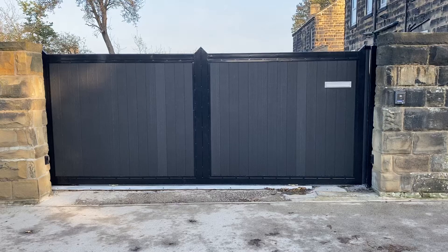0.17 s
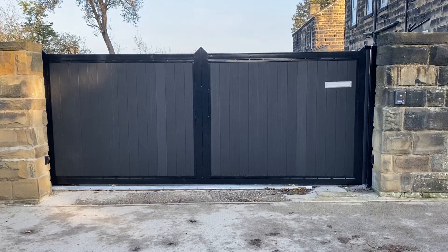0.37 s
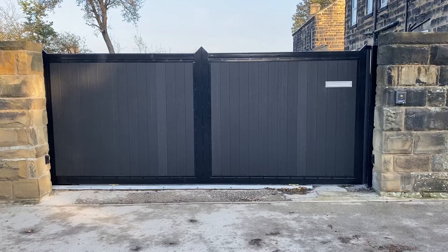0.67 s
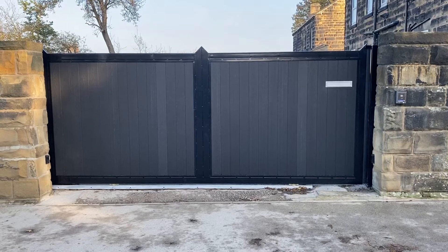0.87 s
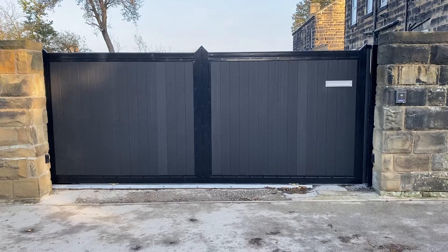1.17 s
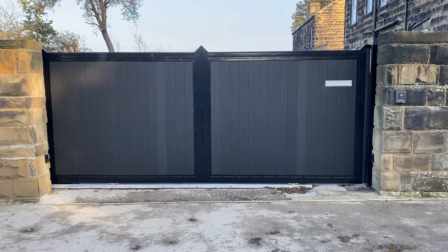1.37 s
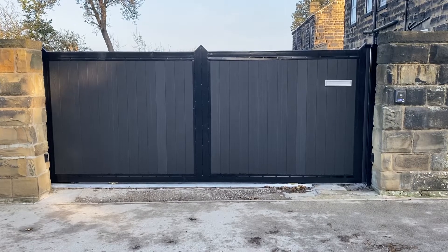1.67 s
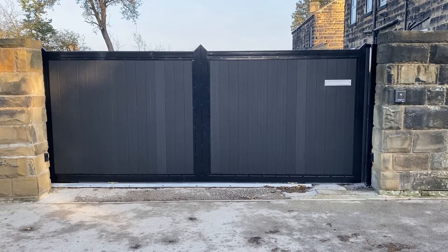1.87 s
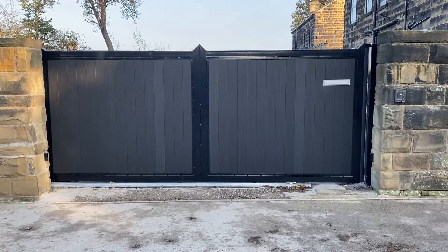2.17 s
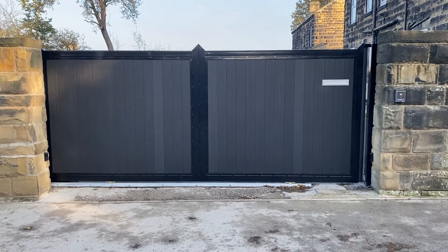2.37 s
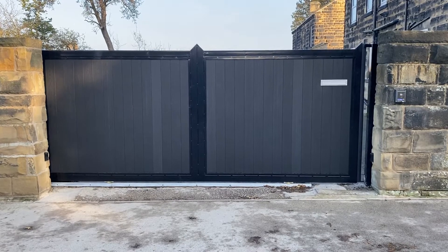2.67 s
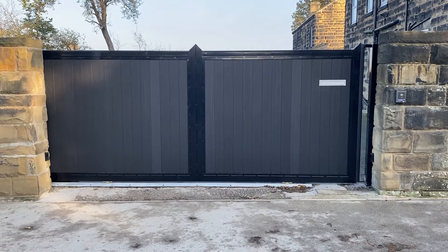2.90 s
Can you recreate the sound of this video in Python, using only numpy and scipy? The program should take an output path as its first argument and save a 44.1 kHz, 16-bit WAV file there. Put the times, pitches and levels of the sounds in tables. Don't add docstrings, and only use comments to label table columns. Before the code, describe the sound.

Distant traffic rumble and hiss outdoors, with a driveway gate motor humming and rolling late

```python
import sys
import numpy as np
from scipy import signal
from scipy.fft import rfft, irfft, next_fast_len
from scipy.io import wavfile
from scipy.ndimage import uniform_filter1d

SR = 44100
rng = np.random.default_rng(int(sys.argv[2]) if len(sys.argv) > 2 else 0)


def unload_wav(signal):
    wavfile.write(
        sys.argv[1],
        SR,
        np.round(np.clip(np.atleast_2d(signal).T, -1, 1) * 32767).astype(np.int16),
    )


def boost(x):
    u = np.asarray(x, float) / 20
    return 10 ** u


N = 134064

# pitch_hz, density_db (per Hz)
TRAFFIC_COLOUR = [(18, -42.5), (30, -12.5), (44, -6.5), (64, -4.5), (85, -9), (107, -8), (204, -9.5),
                  (396, -21), (800, -30.5)]
# pitch_hz, density_db (per Hz)
TYRE_COLOUR = [(450, -4), (950, 1.68), (1950, -7), (2450, -14), (3400, -19), (5200, -34.5), (8500, -48),
               (10300, -49), (12400, -56.5)]
# time_s, level_db
TRAFFIC_FLOW = [(0, 1.5), (.3, 0.9), (.7, 1.1), (1.1, 0.14), (1.5, -0.05), (1.9, 0.47), (2.4, 1.1),
                (3.04, 2.5)]
# time_s, level_db
PASSING_BOOM = [
    (0, -34),
    (.2, -51),
    (.5, -70),
    (1.4, -65.5),
    (1.55, -59),
    (1.8, -69.5),
    (2.5, -46),
    (2.9, -55.5),
    (3.04, -48),
]
# middle_s, length_s, pitch_hz, level_db
LORRY_SURGES = [(.13, .1, 78, -43), (.18, .1, 52, -45), (.235, .1, 77, -45), (.31, .1, 52, -46),
                (.47, .1, 58, -46), (.635, .1, 51, -45), (.85, .13, 51, -42), (.96, .08, 58, -48),
                (1.03, .07, 56, -48), (1.1, .13, 50, -43), (1.25, .12, 51, -43), (1.32, .07, 55, -48),
                (1.405, .12, 46, -43), (1.57, .11, 58, -42)]
# time_s, firing_hz, level_db
FAR_ENGINE = [(.1, 51.95, -55), (.5, 53.7, -63), (.9, 54.49, -54), (1.3, 58.94, -54), (1.7, 61.38, -62.5),
              (2.1, 62.37, -64.5)]
# multiple, level_db
ENGINE_ORDERS = [(1, 6.5), (2, -9), (3, -5.5), (4, -2), (5, -14)]
# time_s, pitch_hz, level_db
RIGHT_BIRD = [(.349, 5500, -92), (.358, 5430, -79.5), (.371, 5230, -84), (.388, 5180, -77),
              (.412, 5090, -76), (.43, 5030, -81), (.446, 4960, -73.5), (.459, 4860, -78),
              (.472, 4730, -92)]
# middle_s, length_s, pitch_hz, level_db
FAR_BIRD = [
    (.367, .014, 5850, -84),
    (.411, .022, 5700, -81),
    (.434, .03, 5640, -88),
    (.462, .012, 5580, -87),
    (.845, .01, 5480, -77.5),
    (.851, .01, 5520, -79),
]
# middle_s, length_s, pitch_hz, level_db
LEFT_BIRD = [
    (1.523, .026, 5520, -82.5),
    (1.539, .022, 5470, -82.5),
    (1.555, .022, 5410, -83),
    (1.572, .028, 5320, -80),
    (1.592, .022, 5270, -83),
    (1.61, .022, 5310, -77.5),
    (1.621, .016, 5100, -83),
    (1.629, .018, 5320, -85),
    (1.64, .02, 5060, -86),
    (1.648, .014, 5250, -84),
]
# time_s, level_db
MOTOR_EFFORT = [
    (1.0, -68.5),
    (1.5, -56),
    (1.62, -52),
    (1.7, -45),
    (1.8, -43.5),
    (2.1, -45),
    (2.45, -41.5),
    (2.7, -44.5),
    (3.04, -45),
]
# multiple, level_db
HUM_ORDERS = [(1, 3.6), (3, -12), (5, -27.5)]
# offset_hz, level_db
DRIVE_SIDEBANDS = [(-255, -5), (-54, -2), (0, -2), (54, 0), (170, -4), (250, -2)]
# time_s, share_of_full_speed
GATE_SPEED = [(1.6, .02), (2.0, .3), (2.5, .45), (2.75, .62), (2.9, .9), (3.04, 1)]
# pitch_hz, width_hz, level_db
PANEL_MODES = [(92, 14, -55), (140, 18, -54), (158, 12, -55), (910, 200, -68), (1850, 800, -68),
               (3300, 2500, -78), (5400, 2400, -84), (10080, 260, -100)]
# pitch_hz, likeness (0-1)
PORT_LIKENESS = [(60, .97), (400, .72), (1600, .6), (2230, .06), (3000, .58), (6900, .22), (8400, .7),
                 (10700, .92)]
# pitch_hz, lead_rad
PORT_LEAD = [(30, -.1), (344, -.6), (750, -2.7), (1900, -2.2), (2500, -4.6), (6400, -6.3), (8400, -9.6),
             (10700, -12.57)]
# pitch_hz, level_db
PORT_TILT = [(60, 0), (250, -1.1), (520, -.4), (900, -3.7), (1600, -1.1), (2900, -.3), (5000, 2.3),
             (7300, 0)]

TRAFFIC_DB, TYRES_DB = -44.5, -53
SWELL_DB, FLICKER_DB = 0.3, 1.2
PASSING_HZ, PASSING_WIDTH_HZ = 74.4, 36
NOTE_SAG_HZ_PER_S, SURGE_SAG_HZ_PER_S = 4500, 40
HUM_HZ, HUM_WOBBLE_DB = 46.5, 1.0
THROB_HZ, THROB_DB, THROB_PEAK_S, THROB_FADES_S = 7.1, 2.2, 1.97, 2.5
DRIVE_HZ, DRIVE_DB = 9997, -105
FAN_HZ, FAN_WIDTH_HZ, FAN_DB = 10280, 110, -107
ROLL_HITS_PER_S, ROLL_SCATTER_DB, BRIGHT_FROM_HZ = 2500, 1.5, 3000
RUMBLE_CUT_HZ, MIC_TOP_HZ = 33, 12200
START_S, SWITCH_STEP, SWITCH_SETTLE_S = 3200 / 44100, -.0095, .001


def curve(table, col=1):
    table = np.array(table, float)
    return np.interp(np.arange(N) / SR, table[:, 0], table[:, col])


def along(table, hz):
    table = np.array(table, float)
    return np.interp(np.log(hz + 1), np.log(table[:, 0] + 1), table[:, 1])


def unit(x):
    return x / np.sqrt(np.mean(x ** 2))


def walk(rate):
    k = int(SR / rate)
    held = np.repeat(rng.standard_normal(N // 400), k)[:N + k]
    slewed = uniform_filter1d(uniform_filter1d(held, k), k)
    return 1.317 * slewed[:N]


def ring(x, hz, width_hz):
    offset = (np.fft.rfftfreq(N, 1 / SR) - hz) / (width_hz / 2)
    return irfft(rfft(x) / (1 + offset ** 2), N)


def stack(hz, orders, wobble_db):
    phase = 2 * np.pi * np.cumsum(hz) / SR
    out = 0
    for multiple, db in orders:
        level = np.sqrt(2) * boost(db + wobble_db * walk(9.29))
        out = out + level * np.sin(multiple * phase + 2 * np.pi * rng.random())
    return out


def swells(rows, sag, lead=0):
    out = 0
    for middle, length, hz, db in rows:
        t = np.arange(N) / SR - middle
        shape = np.cos(np.pi * np.clip(t / length, -.5, .5)) ** 2
        phase = 2 * np.pi * (hz - sag * t / 2) * t + 2 * np.pi * rng.random()
        out = out + np.sqrt(2) * boost(db) * shape * np.sin(phase + lead)
    return out


def road(colour_table, level_db, swell):
    hz = np.fft.rfftfreq(N, 1 / SR)
    colour = boost(along(colour_table, hz)) * (hz >= colour_table[0][0]) * (hz < colour_table[-1][0])
    noise = rfft(rng.standard_normal((2, N))) * colour
    half_octave = 2 * np.log2(hz + 1)
    out = 0
    for k in range(9, 29):
        band = np.clip(1 - np.abs(half_octave - k), 0, 1)
        out = out + irfft(noise * band, N) * boost(swell + FLICKER_DB * walk(5.94))
    return unit(out) * boost(level_db)


def vehicles():
    firing_hz = curve(FAR_ENGINE) * (1 + 0.0197 * walk(6.2))
    engine = stack(firing_hz, ENGINE_ORDERS, 3.04) * boost(curve(FAR_ENGINE, col=2))
    boom = unit(ring(rng.standard_normal(N), PASSING_HZ, PASSING_WIDTH_HZ)) * boost(curve(PASSING_BOOM))
    return engine + boom + swells(LORRY_SURGES, SURGE_SAG_HZ_PER_S)


def birds():
    t = np.arange(N) / SR
    side = np.array([[.5], [-.5]])
    lead = 1.6 * side
    phase = 2 * np.pi * np.cumsum(curve(RIGHT_BIRD) + 14 * walk(87)) / SR
    sings = (t > RIGHT_BIRD[0][0]) * (t < RIGHT_BIRD[-1][0])
    level = boost(curve(RIGHT_BIRD, col=2) + .4 + 1.2 * walk(90) - 3 * side)
    whistle = np.sqrt(2) * sings * level * np.sin(phase + lead)
    chips = swells(FAR_BIRD, NOTE_SAG_HZ_PER_S, lead) * boost(-3 * side)
    left = swells(LEFT_BIRD, NOTE_SAG_HZ_PER_S, lead) * boost(1.3 + 7.5 * side)
    return whistle + chips + left


def motor():
    t = np.arange(N) / SR
    hum = stack(HUM_HZ * (1 + 0.01211 * walk(4.973)), HUM_ORDERS, HUM_WOBBLE_DB) * boost(curve(MOTOR_EFFORT))
    throb = THROB_DB * np.cos(2 * np.pi * THROB_HZ * (t - THROB_PEAK_S))
    hum = hum * boost(throb / (1 + np.exp((t - THROB_FADES_S) / .08)))
    drive_orders = [(DRIVE_HZ + offset, db) for offset, db in DRIVE_SIDEBANDS]
    whine = stack(np.ones(N), drive_orders, 3.0) * boost(DRIVE_DB) * curve(GATE_SPEED) ** 2
    fan = unit(ring(rng.standard_normal(N), FAN_HZ, FAN_WIDTH_HZ)) * boost(FAN_DB)
    return hum + whine + fan


def wheels():
    hits = (rng.random((2, N)) < ROLL_HITS_PER_S / SR) * rng.standard_normal((2, N))
    hits = hits * boost(ROLL_SCATTER_DB * walk(14)) + 0.055 * rng.standard_normal((2, N))
    speed = np.clip(curve(GATE_SPEED), 0, 1)
    out = 0
    for hz, width_hz, db in PANEL_MODES:
        steepness = 2 if hz > BRIGHT_FROM_HZ else 1
        out = out + unit(ring(hits, hz, width_hz)) * boost(db) * speed ** steepness
    return out


def ports(first, second):
    size = next_fast_len(N + 4096)
    hz = np.fft.rfftfreq(size, 1 / SR)
    like = np.clip(along(PORT_LIKENESS, hz), 0, 1)
    tilt = boost(along(PORT_TILT, hz) / 2)
    turn = np.exp(.5j * along(PORT_LEAD, hz))
    first, second = (rfft(np.pad(x, (0, size - N), "reflect")) for x in (first, second))
    shared = np.sqrt((1 + like) / 2) * first
    own = np.sqrt((1 - like) / 2) * second
    left = (shared + own) * turn * tilt
    right = (shared - own) / turn / tilt
    return irfft(np.array([left, right]), size)[:, :N]


def scene():
    swell = SWELL_DB * walk(1.24) + curve(TRAFFIC_FLOW)
    field = road(TRAFFIC_COLOUR, TRAFFIC_DB, swell) + road(TYRE_COLOUR, TYRES_DB, swell) + wheels()
    return ports(field[0] + vehicles() + motor(), field[1]) + birds()


def low_pass(x):
    return signal.sosfilt(signal.butter(12, 16500, fs=SR, output="sos"), x)


def record(dry):
    dry = signal.sosfilt(signal.butter(2, RUMBLE_CUT_HZ, "high", fs=SR, output="sos"), dry)
    dry = signal.sosfilt(signal.ellip(8, .2, 60, MIC_TOP_HZ, fs=SR, output="sos"), dry)
    since = np.arange(N) / SR - START_S
    settle = np.exp(-np.abs(since) / SWITCH_SETTLE_S)
    dry = dry * (1 - settle) + SWITCH_STEP * settle
    switched_on = np.arange(N) >= START_S * SR
    return low_pass(dry * switched_on)


dry = scene()
out = record(dry)
unload_wav(out)
```